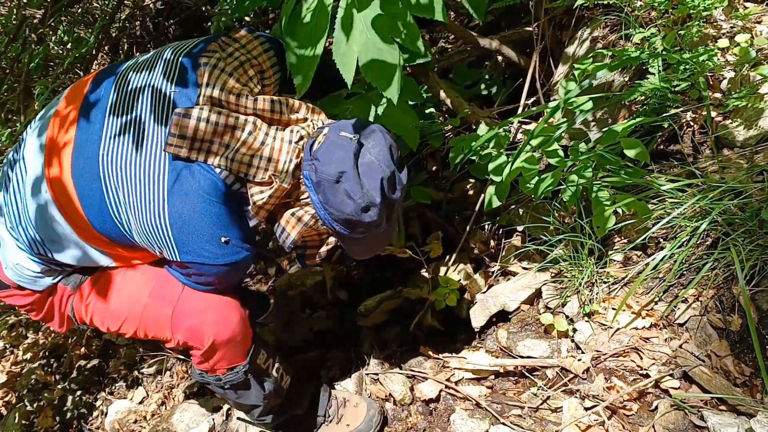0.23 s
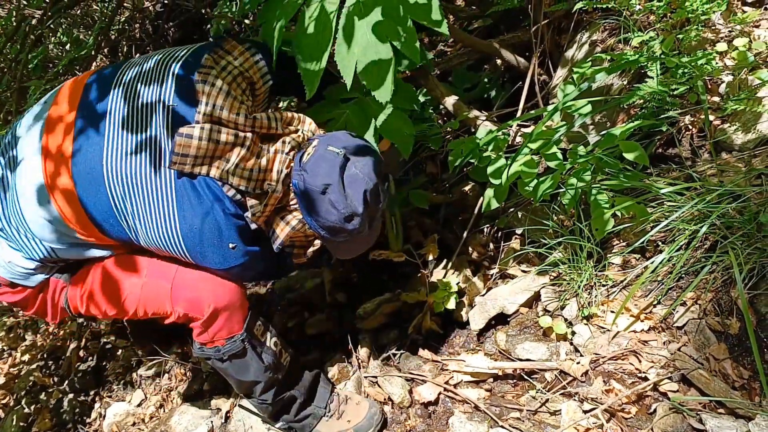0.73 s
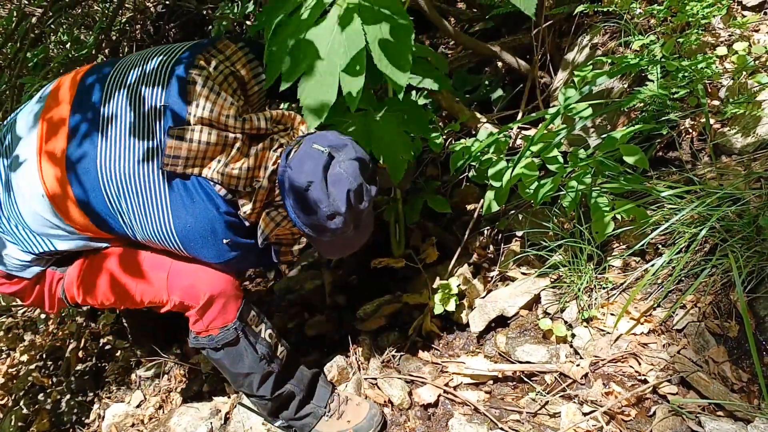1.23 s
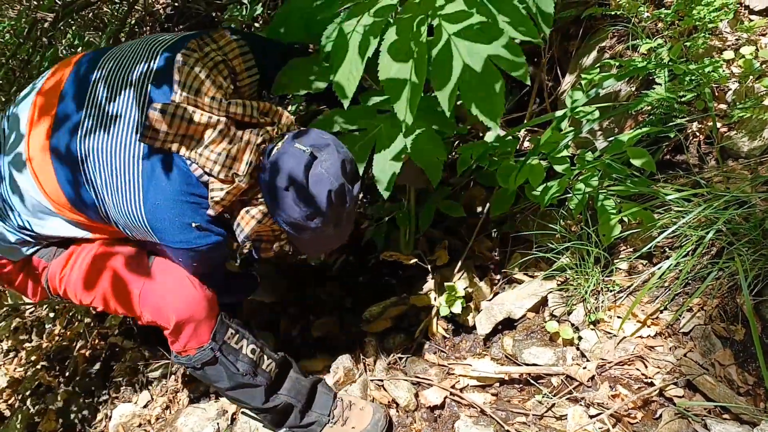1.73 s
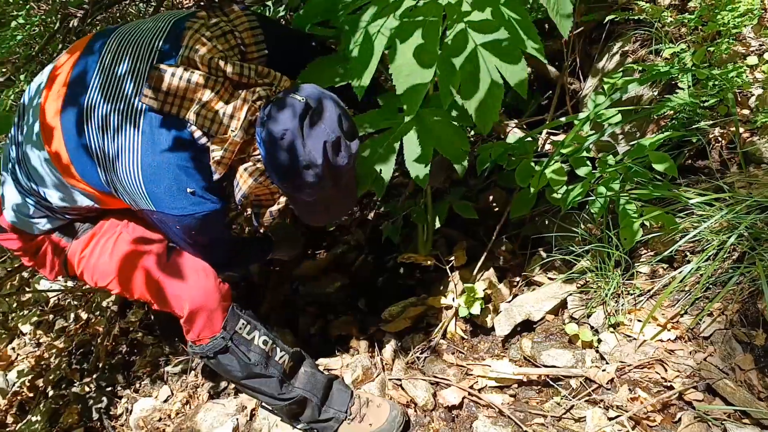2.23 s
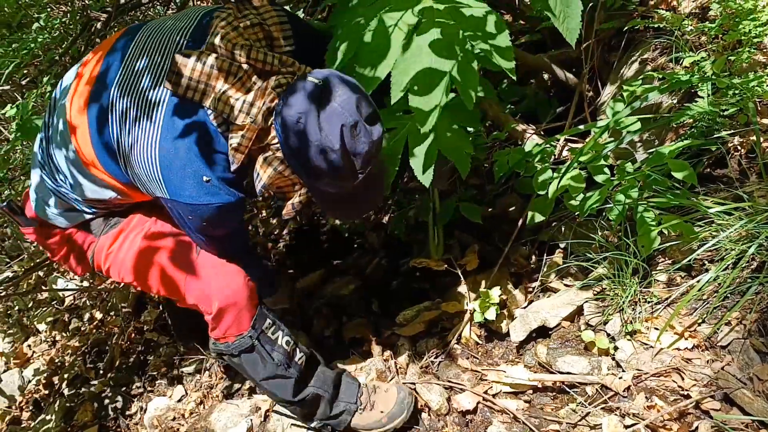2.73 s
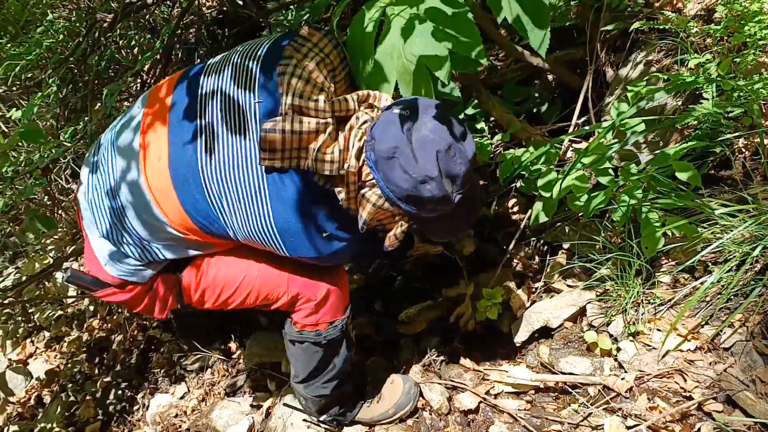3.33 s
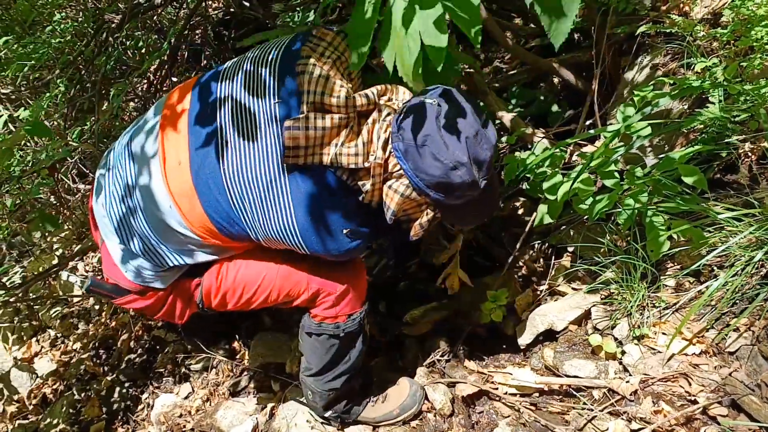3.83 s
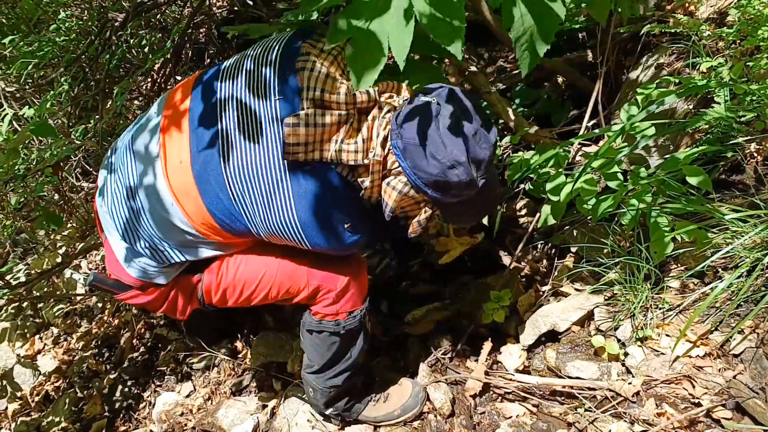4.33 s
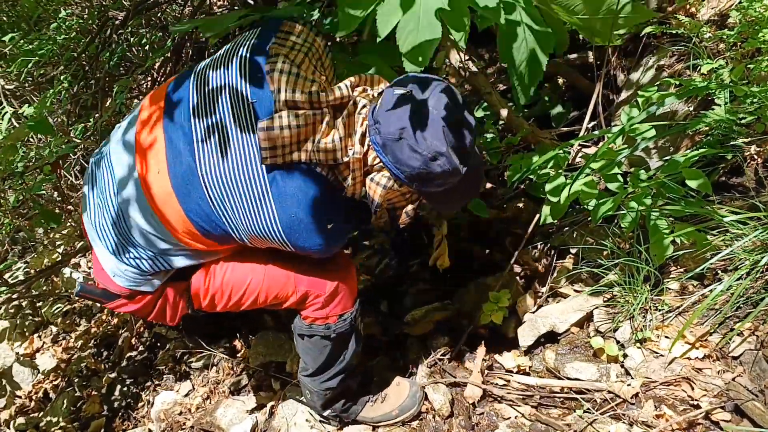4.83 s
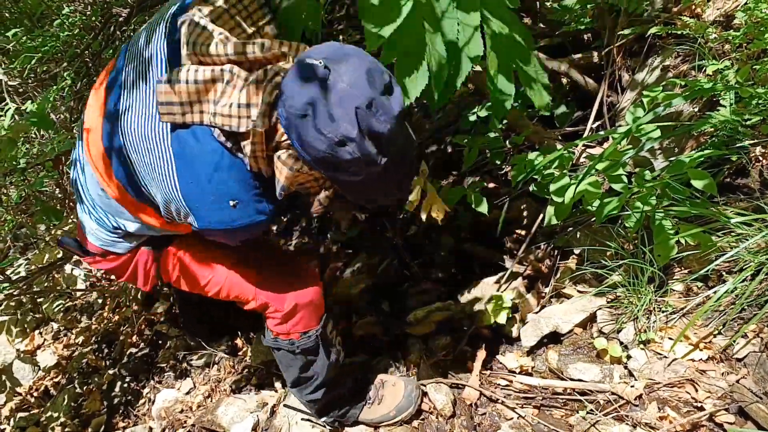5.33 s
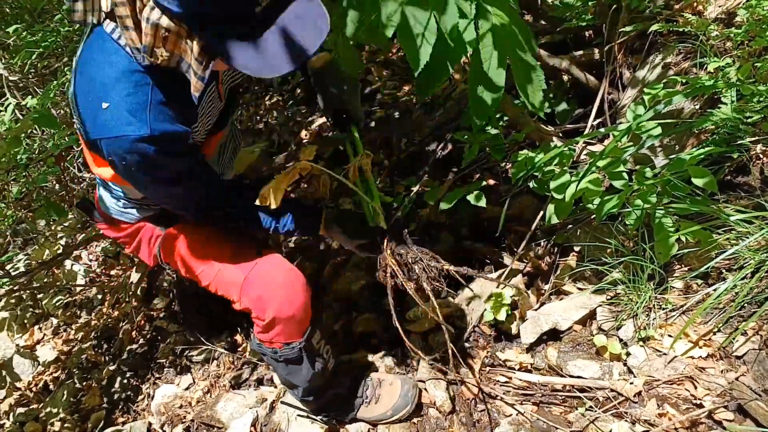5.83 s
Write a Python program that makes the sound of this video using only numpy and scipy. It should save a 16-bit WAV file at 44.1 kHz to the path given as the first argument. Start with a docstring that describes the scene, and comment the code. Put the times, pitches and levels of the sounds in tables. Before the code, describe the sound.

Outdoors on a stony forest slope, heard from about two metres, faint air noise lies under dry, irregular rustling. A small leaf rustle opens at 0 s; at 0.2 s a stone knocks on earth with a gritty scrape and soft low bump. Tiny rootlets tick from 0.6 s, with sparse rustling until about 1.4 s. At 1.7 s a strong tug brings swishing leaves, crunching litter, dull thuds and several crisp snaps together, fading by 2.2 s. After a quieter gap, the loudest hard stone clacks strike at 2.65 s, followed by a bright snap at 2.75 s, rustling, and another solid knock near 3.05 s. From 3.4 to 4.6 s come lighter rubs, small snaps, occasional thuds and a slow swell of litter around 4.1 s. Then mostly faint stirring remains, until a short last tug and thin snap at 5.8 s.

```python
"""Someone crouching on a stony forest slope works a plant out of the ground, outdoors, about 2 m away.
From the start soil, litter and leaves rustle (noise bands under tug envelopes) over faint steady air noise;
from 0.2 s a boot knocks stones on earth (damped sines, grit noise), stems rub (swelling narrow noise) and the
ground bumps (low damped sine); from 0.6 s rootlets snap (decaying noise). Snaps and knocks crowd at 1.7 s,
the hardest knocks come at 2.65 s; events then thin out to a last tug and snap at 5.8 s."""
import sys
import numpy as np
from scipy import signal
from scipy.io import wavfile

SR = 44100
rng = np.random.default_rng(int(sys.argv[2]) if len(sys.argv) > 2 else 0)


def to_wav(sig):
    """Store sig (one row per channel, or 1-D mono) as 16-bit WAV at the path in sys.argv[1].

    Samples outside -1..1 are clipped; the rate is SR.
    """
    pcm = np.clip(np.atleast_2d(sig), -1, 1) * 32767
    pcm = np.round(pcm).astype(np.int16)
    wavfile.write(sys.argv[1], SR, pcm.T)  # frames by channels


N = 267775
TIME = np.arange(N) / SR


def from_db(db):
    """Decibels to amplitude."""
    return 10 ** (np.asarray(db) / 20)


def rms_one(x):
    """Scale to rms 1 over all channels."""
    return x / np.sqrt(np.mean(x ** 2) + 1e-20)


def at_hz(points, hz):
    """Read a table on a log-frequency axis."""
    table_hz, values = np.array(points).T
    return np.interp(np.log(hz), np.log(table_hz), values)


def band(x, low_hz, high_hz):
    """Causal band-pass."""
    edges_hz = [low_hz, min(high_hz, .47 * SR)]
    return signal.sosfilt(signal.butter(2, edges_hz, "band", fs=SR, output="sos"), x)


def add(out, start_s, sound):
    """Mix a sound in at a time, cut off at the end."""
    start = max(round(start_s * SR), 0)
    out[:, start:start + sound.shape[-1]] += sound[..., :N - start]


def panned(hz):
    """Left and right gain at a frequency."""
    # stereo balance: f/Hz, left minus right/dB
    balance = [(60, 4), (200, 2), (380, -0.5), (750, 5), (1300, 1), (2400, 0), (4400, -2.5), (7000, -3.5),
               (10000, -1.5), (14000, 2.5)]
    return from_db(at_hz(balance, hz) * np.array([[.5], [-.5]]))


def stereo(pair, hz):
    """Mix two unrelated noises into a left and right whose correlation depends on frequency."""
    # stereo correlation: f/Hz, left-right correlation/1
    likeness = [(60, 0.17), (130, 0.5), (290, .8), (640, 0.66), (1400, 0.55), (3100, 0.04), (6800, 0),
                (15000, 0)]
    alike = np.clip(at_hz(likeness, hz), -1, 1)
    middle = np.sqrt(1 + alike) * pair[0]
    side = np.sqrt(1 - alike) * pair[1] * [[1], [-1]]
    return (middle + side) * panned(hz)


def grains(per_s, spread_db, life_s):
    """Power of many tiny random bursts of uneven size, each decaying exponentially; mean 1."""
    born = np.flatnonzero(rng.random(N) < per_s / SR)
    size_draws = np.minimum(rng.exponential(1, 4096), 4)
    sizes = np.full(N, 1e-18)
    sizes[born] = from_db(spread_db * size_draws[born % 4096]) ** 2
    power = signal.lfilter([1], [1, -np.exp(-1 / (life_s * SR))], sizes)
    return power / power.mean()


def texture(spectrum, per_s, spread_db, life_s, grain_share, count, ringing_db=4.0, ringing_s=0.0087):
    """Banded noise: a smooth part, grains common to all bands, sparser grains in single bands; rms 1."""
    edges_hz = np.geomspace(spectrum[0][0], spectrum[-1][0], count + 1)
    white = rng.standard_normal((2, 2, N))
    broad = grains(per_s, spread_db, life_s)
    share, out = np.clip(grain_share, 0, 1), 0
    for k, (low_hz, high_hz) in enumerate(zip(edges_hz, edges_hz[1:])):
        hz = np.sqrt(low_hz * high_hz)
        single = grains(per_s / 4, ringing_db, ringing_s)
        power = 1 - share + share * (broad + 2 * single) / 3
        noise = band(white[k % 2] * np.sqrt(power), low_hz, high_hz)   # neighbouring bands are unrelated
        out = out + from_db(at_hz(spectrum, hz)) * stereo(noise, hz)
    return rms_one(out)


def mode(t, hz, rise_s, t60_s):
    """A damped sine that swells during contact; envelope peak 1 before panning."""
    envelope = (1 - np.exp(-(t / rise_s) ** 2)) * from_db(-60 * t / t60_s)
    return envelope / envelope.max() * np.sin(2 * np.pi * hz * t) * panned(hz)


def rustle():
    """Soil, litter and leaves, each with its own grain, follow the tugging."""
    # spectra of crumbling soil, crackling litter, swishing leaves; the top band also carries a peak at 6.9 kHz
    # and a dip at 8.3 kHz: f/Hz, relative density/(dB per Hz)
    soil_spectrum = [(35, -26.5), (90, -2.5), (180, -7), (350, 1.5), (520, -4.5), (700, -11.5)]
    litter_spectrum = [(450, -16.5), (620, -8), (850, -0.5), (1400, 0), (1900, -2.5), (2500, 2.5),
                       (3300, -7), (4500, -15.5)]
    leaves_spectrum = [(2200, -17.5), (3200, 1.5), (4300, 0.5), (5500, 0), (6900, 2.5), (8300, -8),
                       (10500, -2.5), (13000, -6.5), (16000, -10.5)]
    soil = texture(soil_spectrum, per_s=150, spread_db=4.5, life_s=0.0079, grain_share=0.67, count=12)
    litter = texture(litter_spectrum, per_s=250, spread_db=7.0, life_s=0.0034, grain_share=0.78, count=20)
    leaves = texture(leaves_spectrum, per_s=240, spread_db=4.5, life_s=0.0023, grain_share=0.74, count=22)
    soil_gain, litter_gain, leaves_gain = disturbance()
    return soil_gain * soil + litter_gain * litter + leaves_gain * leaves


def disturbance():
    """Gain of soil, litter and leaves: the tugs add in power to the faint stirring."""
    # tugs and body shifts: start/s, build-up/s, hold/s, soil level/dB, litter level/dB, leaves level/dB
    tugs = [(0.0, 0.0017, 0.013, -56, -49, -44), (0.187, 0.046, 0.15, -57, -50, -56),
            (0.284, 0.011, 0.019, -57, -50, -49), (0.591, 0.0087, 0.05, -61.5, -57.5, -58.5),
            (0.73, 0.054, 0.0093, -61, -60, -55), (1.088, 0.19, 0.25, -74, -57, -51.5),
            (1.661, .025, 0.022, -42.5, -39, -32), (1.726, 0.026, 0.11, -54.5, -48.5, -40),
            (1.845, 0.011, 0.02, -49, -43, -34.5), (2.626, 0.017, 0.057, -50.5, -37.5, -36.5),
            (2.66, 0.088, 0.034, -57, -45, -44.5), (2.838, .008, 0.056, -47, -44, -44.5),
            (2.889, .04, .14, -55.5, -45, -42.5), (3.078, .05, 0.073, -59, -51, -53),
            (3.277, 0.063, 0.016, -60.5, -50, -58.5), (3.437, 0.056, 0.15, -57.5, -51, -55),
            (3.704, 0.028, 0.02, -58.5, -52, -52), (3.847, 0.033, 0.0088, -66, -55.5, -53.5),
            (3.956, 0.24, 0.013, -57.5, -47.5, -44.5), (4.591, 0.013, 0.072, -62.5, -55.5, -55.5),
            (4.751, 0.054, .01, -66.5, -54, -55.5), (4.935, 0.058, 0.035, -80, -61.5, -51.5),
            (5.469, 0.039, 0.048, -70, -64.5, -64), (5.826, .015, 0.012, -72.5, -54.5, -48)]
    # faint stirring between tugs: t/s, level before the material offsets/dB
    stir = [(0.0, -55.5), (0.55, -57), (0.9, -70.5), (1.12, -67.5), (1.55, -57), (2.0, -57.5),
            (2.35, -61.5), (2.58, -63.5), (3.2, -54), (3.8, -59), (3.96, -61.5), (4.35, -55.5), (4.53, -65),
            (4.66, -58.5), (5.1, -58.5), (5.4, -62), (5.79, -62.5), (6.07, -59)]
    material_db = np.array([[-13.5], [-4.5], [-1]])   # soil, litter, leaves re stirring
    power = from_db(np.interp(TIME, *np.transpose(stir)) + material_db) ** 2
    for start_s, build_s, hold_s, soil_db, litter_db, leaves_db in tugs:
        gain = from_db([[soil_db], [litter_db], [leaves_db]])
        power = power + (gain * effort(start_s, build_s, hold_s)) ** 2
    return np.sqrt(power)


def effort(start_s, build_s, hold_s, build_power=1.4, shortest_t60_s=.19, t60_per_build=1.0):
    """A tug builds ever faster, holds, dies away; a slow pull also eases off slowly; height 1."""
    t = TIME - start_s
    t60_s = shortest_t60_s + t60_per_build * build_s
    build = np.clip(t / build_s, 0, 1) ** build_power
    return build * from_db(-60 * np.clip((t - build_s - hold_s) / t60_s, 0, 2))


def rubs(briefest_octaves=2.4, halving_length_s=0.018):
    """Quick uneven slips excite one resonance of a sliding stem or leaf; longer rubs are purer in pitch."""
    # rubbing stems, roots and leaves: start/s, length/s, f/Hz, level before the swell/dB
    rub_events = [(0.285, 0.036, 4800, -55), (1.727, 0.15, 6970, -42.5), (2.033, 0.027, 4540, -48.5),
                  (2.251, 0.13, 2300, -58.5), (2.631, 0.02, 2070, -42), (3.033, 0.03, 1420, -38),
                  (3.43, 0.19, 2820, -50.5), (3.451, 0.13, 1570, -50.5), (4.131, .014, 2800, -47.5),
                  (4.412, 0.02, 3100, -49), (4.767, 0.013, 4220, -49), (4.859, 0.02, 2800, -58.5),
                  (4.943, 0.023, 3270, -51), (5.222, 0.023, 5920, -55)]
    out, slips = np.zeros((2, N)), np.sqrt(grains(300, 1.8, 0.0034))
    for s, length_s, hz, db in rub_events:
        octaves = briefest_octaves / (1 + length_s / halving_length_s)
        size, width = int(length_s * SR), 2 ** (octaves / 2)
        white = rng.standard_normal((2, 2, SR // 2))[..., :size]
        hiss = white * np.roll(slips, -int(s * SR))[:size]
        sound = rms_one(stereo(band(hiss, hz / width, hz * width), hz))
        swell = np.sqrt(np.hanning(size))
        add(out, s, from_db(db) * swell * sound)
    return out


def knocks(thud_rise_s=0.0045, thud_t60_s=0.03, grit_t60_s=0.049):
    """The earth gives a dull thud, the stone rings, and grit is crushed under it."""
    # boot and stones on ground: t/s, thud f/Hz, thud level/dB, ring focus f/Hz,
    # ring level/dB, clack level/dB, initial grit level/dB
    knock_events = [(0.196, 415, -49, 1010, -36.5, -40, -33.5), (.645, 390, -62, 790, -49, -66, -69),
                    (1.432, 567, -87, 740, -41, -56.5, -64), (1.709, 321, -26, 900, -33.5, -55, -26),
                    (1.715, 383, -28, 1010, -31, -42, -26), (1.864, 381, -39, 750, -44, -43, -35.5),
                    (1.955, 406, -46.5, 1200, -58, -63, -49), (2.083, 343, -53.5, 1300, -62, -45, -47.5),
                    (2.172, 300, -62, 800, -70, -64, -56.5), (2.6535, 370, -30.5, 1400, -9, -6, -22.5),
                    (2.6562, 378, -28.5, 750, -7, -29.5, -29), (2.673, 366, -19.5, 910, -24.5, -37, -28.5),
                    (2.849, 377, -39.5, 1300, -39, -50, -38.5), (2.976, 316, -38.5, 1000, -37, -56, -57),
                    (3.038, 318, -35.5, 1350, -38, -52, -42), (3.0564, 486, -28.5, 890, -13, -25, -35.5),
                    (3.0598, 412.5, -16, 1000, -22.5, -38, -29), (3.57, 304, -38, 560, -38.5, -60, -48),
                    (3.741, 391, -51.5, 1300, -63, -51, -42), (4.017, 506, -52, 600, -52, -74, -65),
                    (4.417, 350, -57, 1400, -41, -40.5, -48.5), (4.611, 356, -35.5, 570, -42.5, -41.5, -39)]
    out, t = np.zeros((2, N)), TIME[:SR // 6]
    for s, thud_hz, thud_db, centre_hz, ring_db, clack_db, grit_db in knock_events:
        thud = from_db(thud_db) * mode(t, thud_hz, thud_rise_s, thud_t60_s)
        stone = knock_stone(t, centre_hz, ring_db, clack_db)
        white = rng.standard_normal((2, len(t)))
        grit = rms_one(stereo(band(band(white, 430, 2900), 300, 3300), 1300))
        add(out, s, thud + stone + grit * from_db(grit_db - 60 * t / grit_t60_s))
    return out


def knock_stone(t, centre_hz, ring_db, clack_db, focus_db_per_octave=10):
    """The place of contact favours the modes near one pitch; the hard clack sits on top."""
    # modes of a stone in its bed, then of stone-on-stone contact: f/Hz, relative level/dB, rise/s, t60/s
    ring_modes = [(594, -11.5, 0.0023, 0.033), (791.3, -2, 0.0021, 0.026), (1017, -6, 0.0018, 0.031),
                  (1220, -8, 0.00058, 0.019), (1361, -1, 0.00045, 0.023)]
    clack_modes = [(1810, -5, 0.00034, .022), (2198, -4.5, .001, 0.021), (2257, -7, .0006, 0.034),
                   (2595, -13.5, 0.00075, 0.072), (3630, -24.5, 0.00074, 0.043)]
    sound = 0
    for hz, db, rise_s, t60_s in clack_modes:
        sound = sound + from_db(clack_db + db) * mode(t, hz, rise_s, t60_s)
    for k, (hz, db, rise_s, t60_s) in enumerate(ring_modes):
        off_centre = abs(np.log2(hz / centre_hz))
        gain = (-1) ** k * from_db(ring_db + db - focus_db_per_octave * off_centre)
        sound = sound + gain * mode(t, hz, rise_s, t60_s)
    return sound


def snaps(crack_db=-11, width=1.25, spray_offset_db=-8, break_db=0, break_t60_s=0.0082):
    """A fibre breaks at once, then leaves a short pitched crack and a broad spray of splinters."""
    # rootlets and twigs: t/s, overall gain/dB, f/Hz, t60/s, splinter level before the offset/dB
    snap_events = [(0.5973, -39.5, 1480, 0.032, -10), (0.7835, -43.5, 2000, 0.045, -18),
                   (0.937, -48.5, 2600, 0.064, -27), (1.381, -39, 3640, 0.058, -3.5),
                   (1.429, -32.5, 10400, 0.12, 1), (1.6724, -35, 2440, 0.089, -2),
                   (1.694, -26, 2490, 0.046, -16), (1.7151, -22, 6000, 0.037, -2),
                   (2.144, -40, 2350, 0.031, -26), (2.4184, -45, 2180, 0.052, -4.5),
                   (2.455, -47, 2320, 0.032, -7), (2.7537, -22, 6000, 0.03, -6.5),
                   (2.893, -31, 3900, 0.035, 2.5), (3.534, -29, 4270, 0.016, -14),
                   (4.139, -35, 5470, .02, -7), (4.188, -36, 8000, .025, 1), (4.205, -36.5, 7400, .025, -4),
                   (4.29, -39.5, 11700, 0.055, -3), (4.586, -30, 6260, 0.025, -6),
                   (5.837, -34.5, 4210, 0.062, -6.5)]
    out, t = np.zeros((2, N)), TIME[:SR // 6]
    for s, gain_db, hz, t60_s, spray_db in snap_events:
        white = rng.standard_normal((2, 2, len(t) + 512))   # 512 samples of filter run-in
        crack = from_db(crack_db) * rms_one(band(white[0], hz / width, hz * width))
        spray = from_db(spray_db + spray_offset_db) * rms_one(band(white[1], 1900, 14000))
        envelope = from_db(-60 * t / t60_s) + from_db(break_db - 60 * t / break_t60_s)
        add(out, s, stereo((crack + spray)[:, -len(t):], hz) * from_db(gain_db) * envelope)
    return out


def treads(centre_hz=105, rise_s=0.0019, t60_s=.14):
    """Soft earth takes the weight with a deep, short bump of slightly random pitch."""
    # weight pressed onto soft ground: t/s, level/dB
    tread_events = [(.208, -50), (2.175, -54), (2.851, -46.5), (3.347, -54), (3.756, -55), (4.428, -52)]
    out, t = np.zeros((2, N)), TIME[:SR // 4]
    for s, db in tread_events:
        hz = centre_hz * rng.uniform(0.72, 1.12)
        add(out, s, from_db(db) * mode(t, hz, rise_s, t60_s))
    return out


def ground_echoes(x, echo_db=-17):
    """Nearby stones send back a few quick reflections, different on each side."""
    out = np.zeros((2, N))
    for channel, delays_s in enumerate([(.0037, .0118), (.0052, .0146)]):
        for delay_s in delays_s:
            out[channel] += np.interp(TIME - delay_s, TIME, x[channel], left=0)
    return from_db(echo_db) * out


def slope(x, t60_s=0.62, wet_db=-26.5, onset_s=.006):
    """Bank, stones and bushes scatter a short diffuse tail."""
    t = TIME[:SR // 2]
    noise = band(rng.standard_normal((2, len(t))), 290, 7100)
    tail = noise * from_db(-60 * t / t60_s) * (t > onset_s)
    tail /= np.sqrt(np.sum(tail ** 2, axis=1, keepdims=True))   # unit energy per side
    return from_db(wet_db) * signal.fftconvolve(x, tail, axes=1)[:, :N]


def outdoor_air(level_db=-67):
    """Faint, nearly smooth banded noise of the open air."""
    # background spectrum: f/Hz, relative density/(dB per Hz)
    air_spectrum = [(30, -19), (60, 1), (95, 3.5), (180, -11), (500, -20), (1000, -15.5), (3000, -10.5),
                    (7000, -19), (15000, -27.5)]
    air = texture(air_spectrum, per_s=200, spread_db=-1.5, life_s=.03, grain_share=.1, count=16)
    return from_db(level_db) * air


def scene(left_lead_s=.00006):
    """Handling and air stay dry; knocks and snaps also get echoes and a tail."""
    handling = rustle() + rubs() + treads()
    blows = knocks() + snaps()
    blows[1] = np.roll(blows[1], round(left_lead_s * SR))   # right lags: slightly to the left
    return handling + blows + ground_echoes(blows) + slope(blows) + outdoor_air()


def record(dry, cutoff_hz=16000):
    """The top is cut steeply by an elliptic low-pass."""
    return signal.sosfilt(signal.ellip(10, .2, 70, cutoff_hz, fs=SR, output="sos"), dry)


dry = scene()
out = record(dry)
to_wav(out)
```